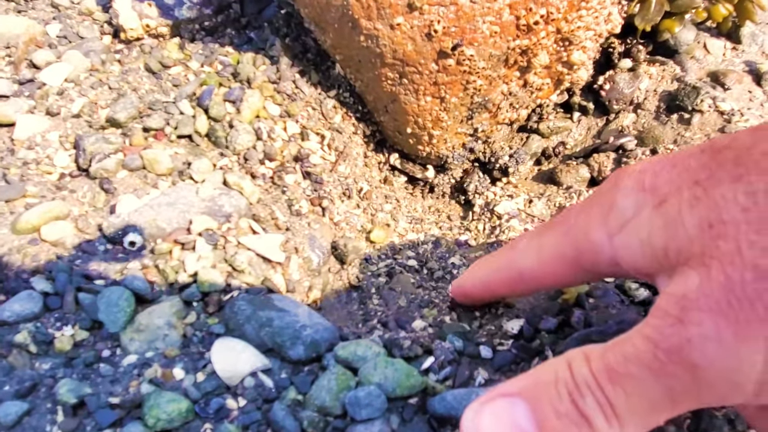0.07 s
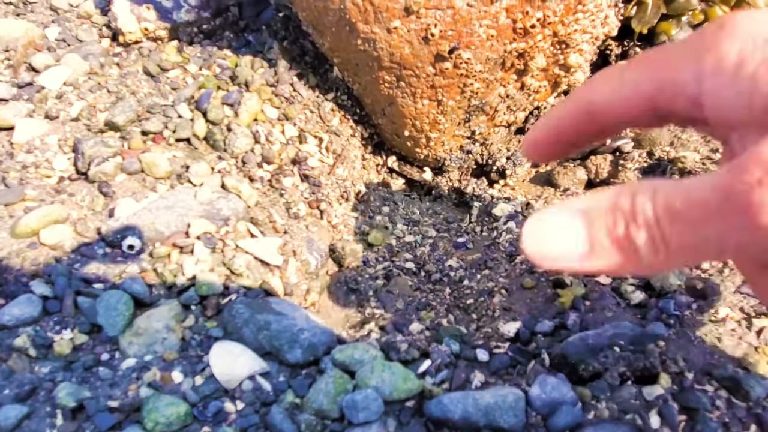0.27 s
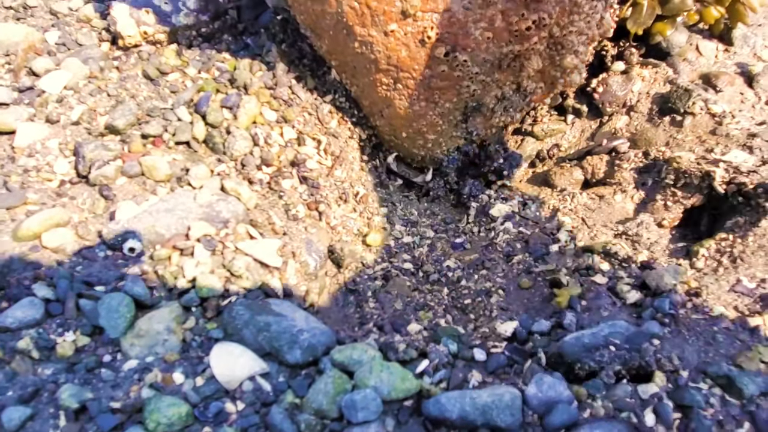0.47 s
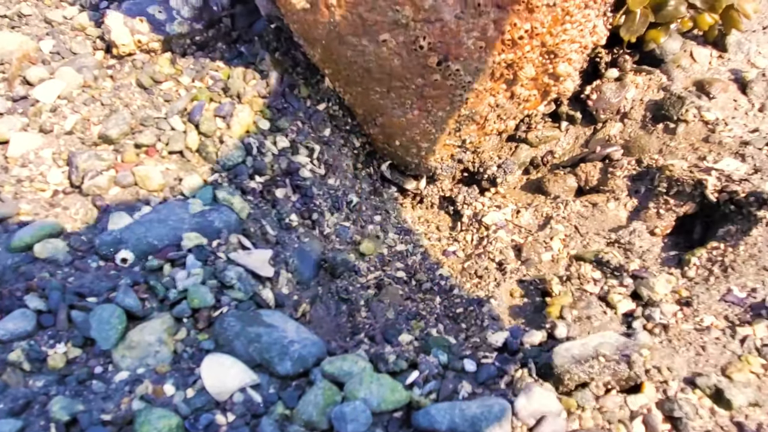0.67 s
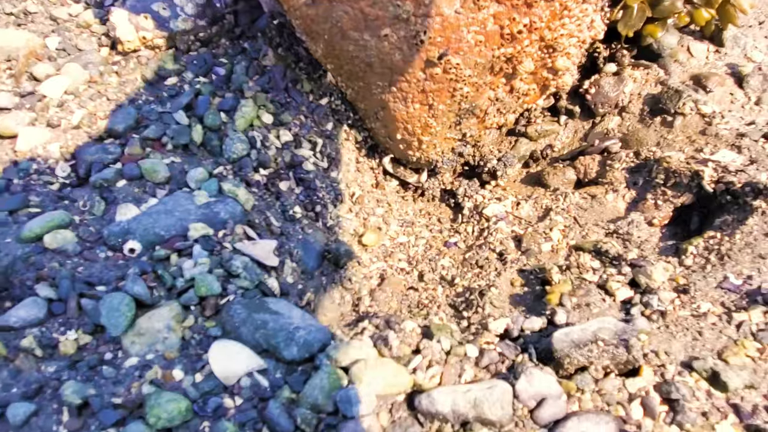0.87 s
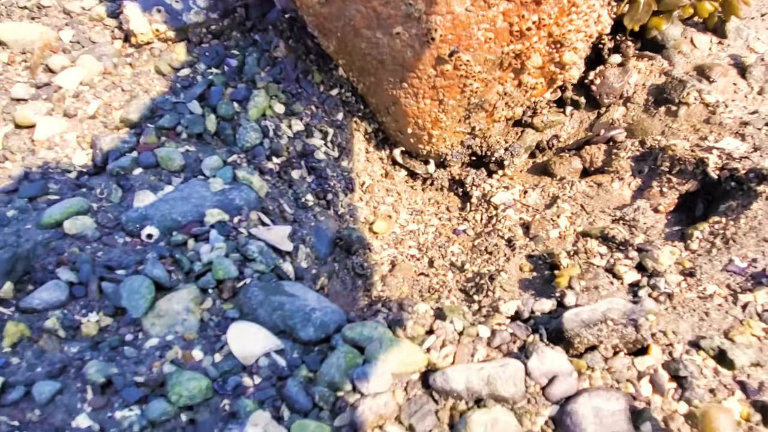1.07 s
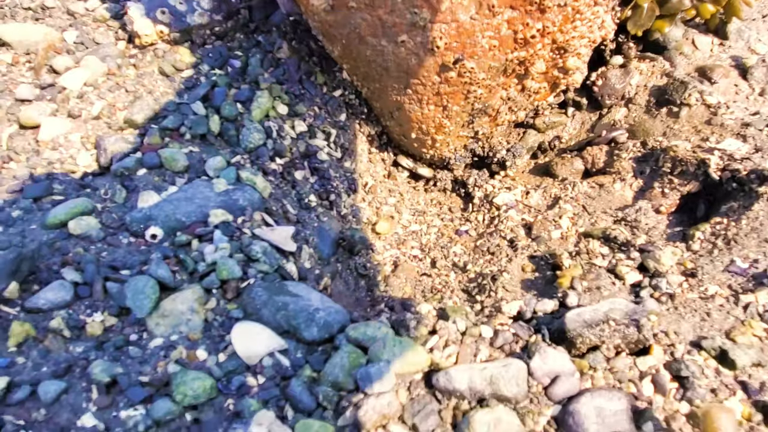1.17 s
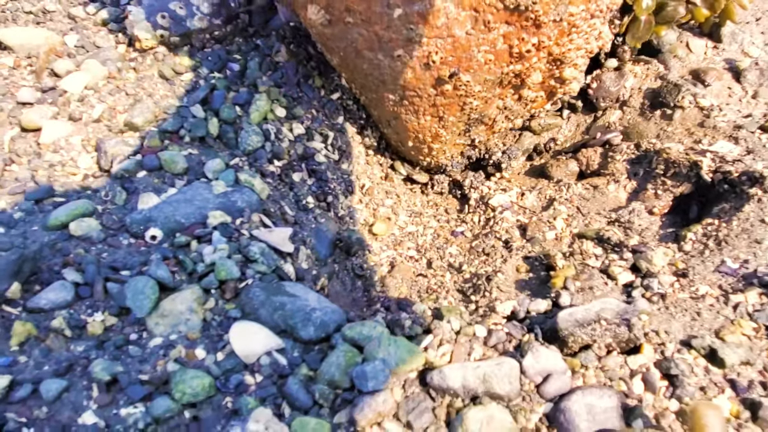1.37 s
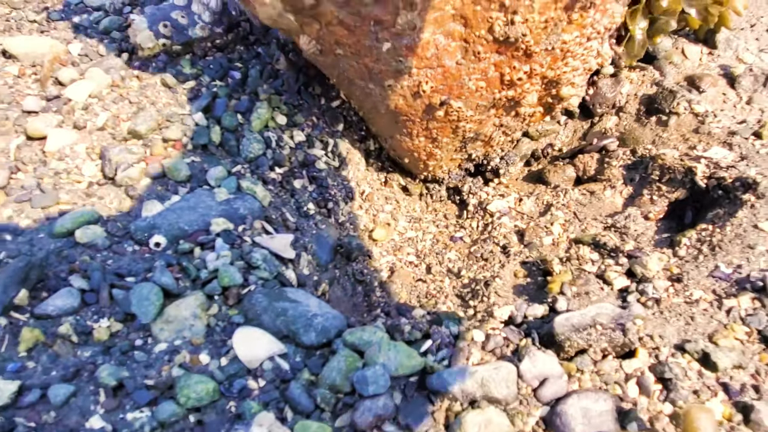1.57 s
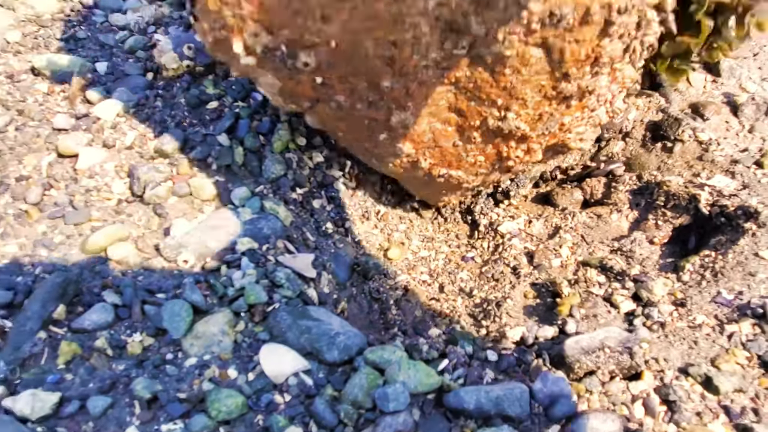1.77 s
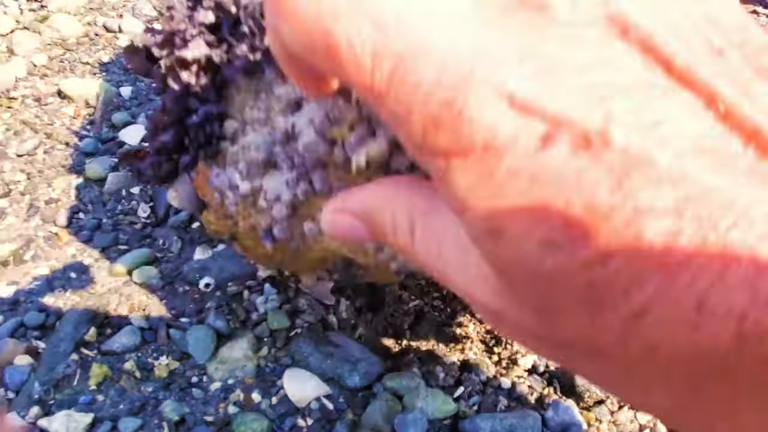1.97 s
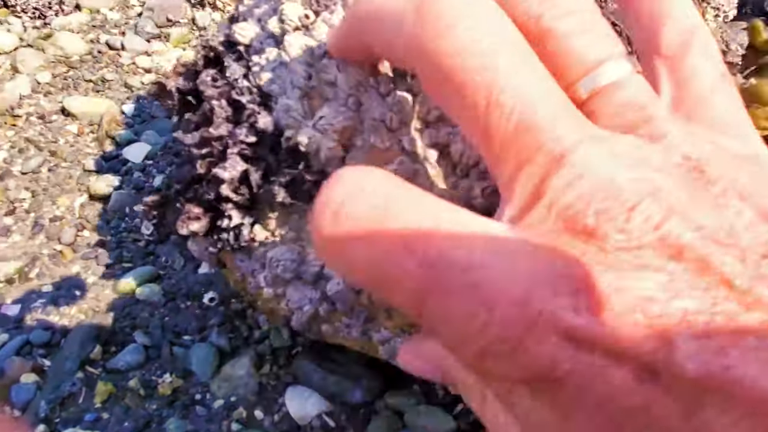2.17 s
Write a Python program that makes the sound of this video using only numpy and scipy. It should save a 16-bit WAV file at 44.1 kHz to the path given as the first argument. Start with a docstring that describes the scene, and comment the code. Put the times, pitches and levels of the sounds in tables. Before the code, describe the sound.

A rough rock is lifted from wet shell gravel: sparse ticks, light grit shifting, then a burst of crunching and sharp shell snaps, ending in dull knocks and a short stone scrape; outdoors, close stereo microphone, low rumble.

```python
"""Over a low outdoor rumble a few shells tick, then grit shifts, crunches and snaps.
A barnacle-covered rock is lifted from wet shell gravel, close to a two-port microphone.
Grit, pebbles and stone scrape are clouds of tiny decaying tones; shell snaps are noise bursts with a ring.
Dull knocks are damped modes; rumble and air are shaped noise, with brief deep swells of a wavering tone."""
import sys
import numpy as np
from scipy.fft import rfft, irfft, next_fast_len
from scipy.io import wavfile
from scipy.ndimage import map_coordinates

SR = 44100
rng = np.random.default_rng(int(sys.argv[2]) if len(sys.argv) > 2 else 0)


def to_wav(sig):
    """Store sig (one row per channel, or 1-D mono) as 16-bit WAV at the path in sys.argv[1].

    Samples outside -1..1 are clipped; the rate is SR.
    """
    pcm = np.clip(np.atleast_2d(sig), -1, 1) * 32767
    pcm = np.round(pcm).astype(np.int16)
    wavfile.write(sys.argv[1], SR, pcm.T)  # frames by channels


N = 97549
TIME_S = np.arange(N) / SR
PORT_LEAD_S, PORT_SCATTER_S = .00002, .000035  # mean and spread of the left port's lead


def amp(db):
    """Decibels to gain."""
    return 10 ** (np.asarray(db) / 20)


def unit(x):
    """Scale to rms 1, over both ports together."""
    return x / np.sqrt(np.mean(x ** 2) + 1e-20)


def along(points, hz):
    """(Hz, value) points read on a log frequency axis."""
    f, v = np.transpose(points)
    return np.interp(np.log(hz + 1), np.log(f + 1), v)


def curve(rows):
    """(s, value) points as one value per sample."""
    return np.interp(TIME_S, *np.transpose(rows))


def stroke(rows):
    """Gain from (s, dB) points, fading over 40 ms before the first and after the last."""
    inside_s = np.minimum(TIME_S - rows[0][0], rows[-1][0] - TIME_S)
    return amp(curve(rows)) * np.clip(1 + inside_s / .04, 0, 1)


def swell(s, width_s):
    """A bell-shaped envelope that peaks at s, with width_s as its standard deviation."""
    return np.exp(-.5 * ((TIME_S - s) / width_s) ** 2)


def wobble(rate):
    """A smooth random curve, rate knots a second."""
    return map_coordinates(rng.standard_normal(4096), [TIME_S * rate], mode="wrap")


def pan(lr_db):
    """Left and right gains for a level difference; positive is louder on the left."""
    return amp(np.array([[.5], [-.5]]) * lr_db)


def filtered(x, response):
    """x times a response of frequency."""
    n = x.shape[-1]
    m = next_fast_len(n + 4096)
    return irfft(rfft(x, m) * response(np.fft.rfftfreq(m, 1 / SR)), m)[..., :n]


def coloured(x, points):
    """x through a causal minimum-phase filter with these (Hz, dB) points."""
    def response(hz):
        # folding the cepstrum onto positive time gives minimum phase
        cepstrum = irfft(np.log(amp(along(points, hz))))
        half = len(cepstrum) // 2
        cepstrum[1:half] *= 2
        cepstrum[half + 1:] = 0
        return np.exp(rfft(cepstrum))
    return filtered(x, response)


def add(out, s, sound):
    """Mix a short stereo sound in at time s."""
    part = out[:, max(0, round(s * SR)):][:, :sound.shape[-1]]
    part += sound[:, :part.shape[1]]


def grains(rate, spread_db, life_s, top_hz, colour, size=96):
    """Tiny contacts (rate per second), each with its own pitch, size and direction; rms 1."""
    count = int(rate * N / SR)
    when, pitch, phase = rng.random((count, 3)).T[..., None]
    loud, lead, side = np.clip(rng.standard_normal((count, 3)), -2.6, 2.6).T[..., None]
    at = (when * N).astype(int) + np.arange(size)
    lead_s = PORT_LEAD_S + PORT_SCATTER_S * lead
    ports = []
    for sign in (.5, -.5):
        t = np.maximum((np.arange(size) - 4) / SR + sign * lead_s, 0)
        tone = np.sin(2 * np.pi * (pitch * top_hz * t + phase))
        envelope = np.exp(-t / life_s) * np.minimum(t * SR / 2, 1)
        gain = amp(spread_db * loud + sign * 8.3 * side)  # left-right spread 8.3 dB
        ports.append(np.bincount(at.ravel(), (tone * envelope * gain).ravel(), N + size)[:N])
    return unit(coloured(np.array(ports), colour))


def rush(spectrum, alike):
    """Stereo noise of rms 1, with a left-right likeness for each frequency."""
    def mid_side(hz):
        turn = np.arccos(np.clip(along(alike, hz), -1, 1)) / 2
        return amp(along(spectrum, hz)) * [np.cos(turn), np.sin(turn)]
    mid, side = filtered(rng.standard_normal((2, N)), mid_side)
    return unit(np.array([mid + side, mid - side]))


# Fine grit moving under the rock. Each row: time in seconds, level in dB.
GRIT_LEVEL = [(.95, -63), (1.06, -47.5), (1.26, -48), (1.34, -54), (1.44, -52), (1.52, -47), (1.56, -50.5),
              (1.7, -41), (1.77, -34), (1.84, -32.5), (1.91, -28), (1.955, -32), (1.985, -41),
              (2.035, -41.5), (2.065, -36), (2.09, -41), (2.13, -39), (2.165, -49), (2.21, -44.5)]
# Tone of grit, also of crackle, rasp and fizz. Each row: frequency in Hz, relative gain in dB.
GRIT_TONE = [(500, -34), (1100, -9.5), (1500, -11), (2000, -4.5), (3200, 1), (4200, -0.5), (4900, -3.5),
             (8000, -1.5), (10000, -6.5), (13000, -11.5), (15500, -12)]
# Grit treble, bright as shells break, duller as the rock slides. Each row: time in seconds, gain in dB.
TREBLE_GAIN = [(1.4, 4), (1.77, 6), (1.89, 0), (2.05, 5.5)]
SHEEN_HZ = 10200


def grit():
    """Sand and shell crumbs crackle in small clumps as the rock pulls out of its bed."""
    contacts = grains(rate=7000, spread_db=0, life_s=0.00012, top_hz=16800, colour=GRIT_TONE)
    crumbs = amp(1.1 * wobble(230)) * contacts
    treble = filtered(crumbs, lambda hz: 1 - 1 / (1 + (hz / SHEEN_HZ) ** 10))
    return stroke(GRIT_LEVEL) * (crumbs + (amp(curve(TREBLE_GAIN)) - 1) * treble)


# Sparse shell fragments breaking. Each row: time in seconds, level in dB.
CRACKLE_LEVEL = [(1.2, -65.5), (1.55, -64.5), (1.72, -45), (1.85, -34.5), (1.97, -46)]


def crackle():
    """Coarser fragments give way sparsely, most strongly as the rock pulls free."""
    fragments = grains(rate=330, spread_db=3.5, life_s=0.00034, top_hz=12600, colour=GRIT_TONE)
    return stroke(CRACKLE_LEVEL) * fragments


# Shell edges slipping. Each row: peak time in seconds, level in dB, resonance in Hz,
# bell width (standard deviation) in seconds.
SLIPS = [(1.799, -42.5, 3255, 0.029), (1.89, -32, 2520, 0.014), (1.955, -50, 3050, 0.01)]
RASP_WIDTH_HZ = 160


def rasp():
    """Shell edges slip and ring: fine contacts drive one band-pass resonance a slip."""
    contacts = grains(rate=4100, spread_db=-1.5, life_s=0.00041, top_hz=5120, colour=GRIT_TONE)
    out = np.zeros((2, N))
    for s, db, hz, width_s in SLIPS:
        def resonance(f):
            damping = 1j * f * RASP_WIDTH_HZ
            return damping / (hz ** 2 - f * f + damping)
        out += amp(db) * swell(s, width_s) * unit(filtered(contacts, resonance))
    return out


# Shells and pebbles snapping, ticking and rebounding. Each row: start in seconds, peak in dB, ring in Hz.
SHELL_SNAPS = [(0.0267, -36.5, 5430), (.169, -29.5, 5770), (.1715, -39, 6360), (0.4559, -47, 3170),
               (0.4575, -39, 3120), (1.11, -35.5, 4560), (1.17, -30.5, 4740), (1.1885, -34, 3600),
               (1.199, -34, 4470), (1.3165, -26.5, 5900), (1.321, -35, 7800), (1.3773, -32, 3680),
               (1.583, -24, 13500), (1.601, -25.5, 6950), (1.6397, -24, 10200), (1.659, -23, 13700),
               (1.689, -31, 3770), (1.744, -24, 3600), (1.7662, -13, 3300), (1.767, -23, 3360),
               (1.7787, -14, 1300), (1.792, -19, 4000), (1.8048, -12.5, 1950), (1.8056, -7.5, 8500),
               (1.8159, -12.5, 7100), (1.8202, -13, 6600), (1.8324, -17, 3900), (1.8363, -9.5, 7650),
               (1.85, -15.5, 5280), (1.8512, -22, 3130), (1.8666, -17, 4000), (1.917, -16.5, 7860),
               (1.9967, -24, 12500)]
# Tone of the noisy crack. Each row: frequency in Hz, gain in dB.
CRACK_TONE = [(300, -12.5), (1700, -0.5), (8500, 8), (15000, -6.5)]
CRACK_T60_S, RING_T60_S, CRUMBS_T60_S = 0.002, 0.0053, 0.058
RING_DB, CRUMBS_DB = 3.5, -15  # before each snap is scaled to its peak


def snaps():
    """Each shell gives a sharp noisy crack, a brief sine ring and a trail of crumb noise."""
    out, t = np.zeros((2, N)), np.arange(SR // 20) / SR
    port_t = t + np.array([[PORT_LEAD_S], [0]])
    decay = amp(-60 * t / CRACK_T60_S) + amp(CRUMBS_DB - 60 * t / CRUMBS_T60_S)
    for s, db, hz in SHELL_SNAPS:
        noise = rng.standard_normal((3, len(t)))
        crack = (0.43 * noise[0] + 0.93 * noise[1:]) * decay  # shared plus separate noise
        ring = np.sin(2 * np.pi * hz * port_t) * amp(RING_DB - 60 * t / RING_T60_S)
        snap = coloured(crack, CRACK_TONE) + ring
        add(out, s, amp(db) * snap / np.abs(snap).max())
    return out


# Pebbles grinding against the rock. Each row: time in seconds, level in dB.
GRIND_LEVEL = [(.97, -73), (1.06, -54), (1.19, -57), (1.35, -67.5), (1.55, -64.5), (1.71, -56.5),
               (1.78, -48), (1.87, -47), (1.95, -38), (2.01, -45.5), (2.04, -37), (2.09, -56),
               (2.125, -42.5), (2.175, -56), (2.2, -47.5)]
# Tone of the grinding. Each row: frequency in Hz, relative gain in dB.
GRIND_TONE = [(200, -5.5), (400, -9.5), (650, -2.5), (1050, 0.5), (1450, -7), (1950, -5.5), (2600, -20),
              (5000, -28)]


def grinding():
    """Larger pebbles rub on the rock with longer, lower-pitched grains."""
    rub = grains(rate=2400, spread_db=3.0, life_s=0.00058, top_hz=3750, colour=GRIND_TONE)
    return stroke(GRIND_LEVEL) * rub


# The rock dragging past a stone. Each row: time in seconds, level in dB.
DRAG_LEVEL = [(2.02, -80), (2.045, -34.5), (2.057, -27), (2.066, -28.5), (2.075, -38), (2.095, -40.5),
              (2.13, -52), (2.16, -75), (2.2, -42)]
# Tone of the drag. Each row: frequency in Hz, relative gain in dB.
DRAG_TONE = [(250, -22), (550, -1.5), (950, 5), (1350, -4.5), (1850, 5.5), (2250, -6), (4300, -6),
             (6500, -9), (9000, -27), (15000, -40)]


def scrape():
    """A short coarse drag of stone on stone, made of dense grains, trails off and faintly returns."""
    drag = grains(rate=6000, spread_db=2.5, life_s=0.0004, top_hz=14600, colour=DRAG_TONE)
    return stroke(DRAG_LEVEL) * drag


# The rock bumping on its neighbours. Each row: start in seconds, peak in dB before panning, pitch ratio.
BUMPS = [(1.777, -37, 0.86), (1.9302, -33, 0.875), (1.9824, -15, 0.983), (1.9865, -31, 0.77),
         (2.031, -26, 1.2), (2.0444, -25, 0.74), (2.1128, -28, 1.1)]
# Modes of the bedded rock. Each row: frequency in Hz at ratio 1, relative level in dB, t60 in seconds.
ROCK_MODES = [(596, 2.5, 0.045), (814, 15.5, 0.015), (957, -4, 0.021)]
KNOCK_ATTACK_S, KNOCK_PAN_DB = 0.00052, 5


def knocks():
    """The bedded rock answers each soft bump with heavily damped modes, pitched by where it is hit."""
    out, t = np.zeros((2, N)), np.arange(SR // 16) / SR
    attack = (1 - np.exp(-t / KNOCK_ATTACK_S)) ** 2
    for s, db, ratio in BUMPS:
        ring = np.zeros(len(t))
        for hz, level, t60 in ROCK_MODES:
            decay = amp(level + rng.normal() - 60 * t / t60)  # mode levels vary by about 1 dB
            ring += decay * np.sin(2 * np.pi * hz * ratio * t)
        ring *= attack
        add(out, s, amp(db) * pan(KNOCK_PAN_DB) * ring / np.abs(ring).max())
    return out


# Outdoor rumble. Each row: time in seconds, level in dB before a random waver.
LOW_LEVEL = [(0, -40), (.7, -39), (1.0, -44.5), (1.25, -39.5), (2.15, -38.5)]
# Its spectrum. Each row: frequency in Hz, relative density in dB per Hz.
LOW_SPECTRUM = [(20, -14), (40, -9), (65, 1), (100, -3), (140, -12.5), (190, -13), (250, -23), (300, -20),
                (400, -38), (700, -61)]
# Its stereo width. Each row: frequency in Hz, left-right likeness (1 is identical).
LOW_LIKENESS = [(30, 0.056), (70, 0.27), (130, 1), (300, 0.67)]


def rumble():
    """Low-frequency noise whose level wavers gently."""
    return amp(curve(LOW_LEVEL) + wobble(11.96)) * rush(LOW_SPECTRUM, LOW_LIKENESS)


# The rumble swells briefly. Each row: peak time in seconds, peak level in dB.
DEEP_SWELLS = [(0.401, -33.5), (.54, -36), (1.61, -29.5), (1.74, -32.5), (1.935, -33), (2.154, -29.5)]
SWELL_HZ, SWELL_WIDTH_S = 63.93, 0.018


def deep_swells():
    """Bell-shaped bursts of one deep tone, its phase wandering and differing between the ports."""
    wander = wobble(30) + np.array([wobble(22), wobble(37)])
    tone = np.sin(2 * np.pi * SWELL_HZ * TIME_S + wander)
    return sum(amp(db) * swell(s, SWELL_WIDTH_S) for s, db in DEEP_SWELLS) * tone


# A faint grainy fizz that dips, swells near 0.38 s, dips, then rises to a steady level.
# Each row: time in seconds, level in dB.
FIZZ_LEVEL = [(0, -72), (.11, -88), (.38, -71), (.55, -82), (.95, -69)]


def faint_fizz():
    """A faint grainy fizz, made of a dense cloud of tiny decaying tones."""
    fizz = grains(rate=7800, spread_db=5, life_s=0.0006, top_hz=12200, colour=GRIT_TONE)
    return amp(curve(FIZZ_LEVEL)) * fizz


# Thin outdoor air. Each row: frequency in Hz, relative density in dB per Hz.
AIR_SPECTRUM = [(200, -7), (500, 0), (800, -8), (1150, -6), (1800, -21), (4500, -19), (9000, -25),
                (15500, -28)]
# Its stereo width. Each row: frequency in Hz, left-right likeness (1 is identical).
AIR_LIKENESS = [(400, 0.77), (1500, 0.05)]
AIR_DB = -64


def air():
    """Steady, very quiet shaped noise, wider in stereo at high frequencies."""
    return amp(AIR_DB) * rush(AIR_SPECTRUM, AIR_LIKENESS)


# Lean of the shell and grit sounds. Each row: time in seconds, left-right difference in dB (positive left).
LEAN = [(1.6, 1), (1.8, -2), (1.87, -1), (1.94, 2), (2.12, 3)]


def scene():
    """The shell and grit sounds lean briefly right, then left, as the rock is lifted."""
    shell_gravel = pan(curve(LEAN)) * (grit() + crackle() + rasp() + snaps())
    rock = grinding() + scrape() + knocks()
    background = rumble() + deep_swells() + faint_fizz() + air()
    return shell_gravel + rock + background


# Colour of the left microphone port. Each row: frequency in Hz, gain in dB.
LEFT_TONE = [(600, -1.5), (1200, 0.5), (2500, 3.5), (5300, 5.5), (6200, 3), (8100, 1.5), (11500, 4.5),
             (13500, 2.5), (15500, 5)]
# Colour of the right microphone port. Each row: frequency in Hz, gain in dB.
RIGHT_TONE = [(600, -1.5), (1200, 1.5), (2500, 0), (4500, -1), (7300, 1.5), (8050, -2), (9000, -3.5),
              (12000, 3), (14400, 6), (15500, -1)]
TOP_HZ = 15950


def record(dry):
    """Each port colours the sound in its own way, then a steep low-pass limits the band."""
    ports = np.array([coloured(dry[0], LEFT_TONE), coloured(dry[1], RIGHT_TONE)])
    return filtered(ports, lambda hz: 1 / (1 + (hz / TOP_HZ) ** 200))


dry = scene()
out = record(dry)
to_wav(out)
```